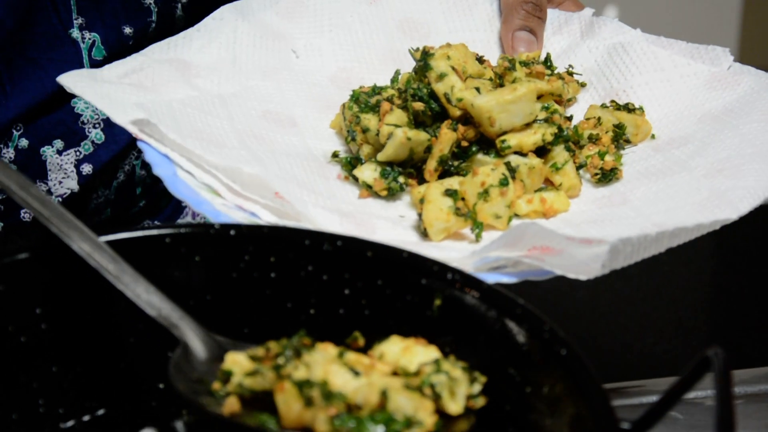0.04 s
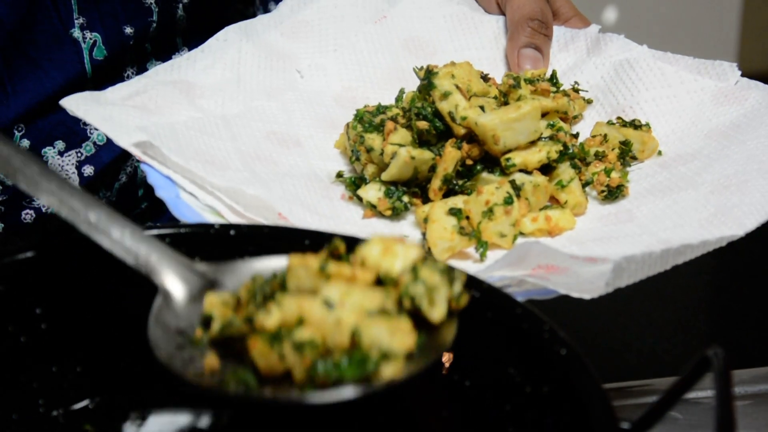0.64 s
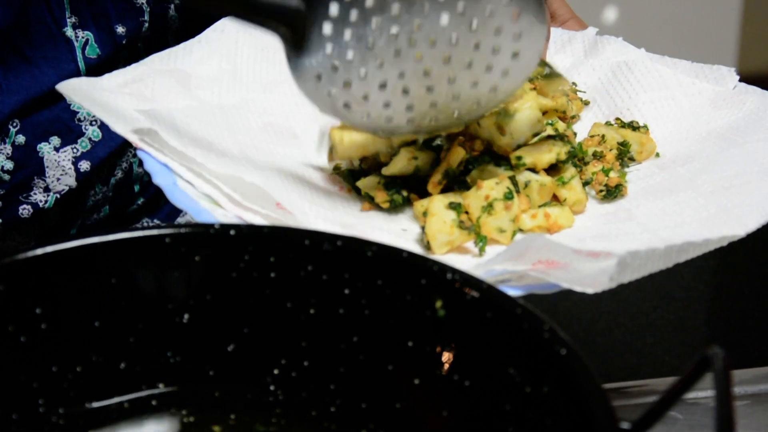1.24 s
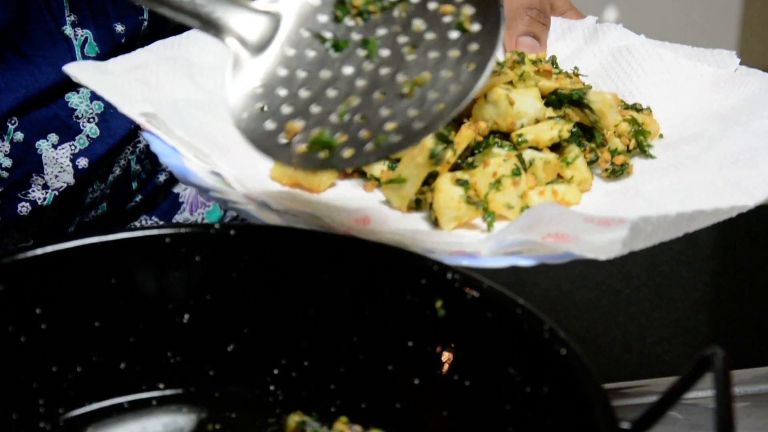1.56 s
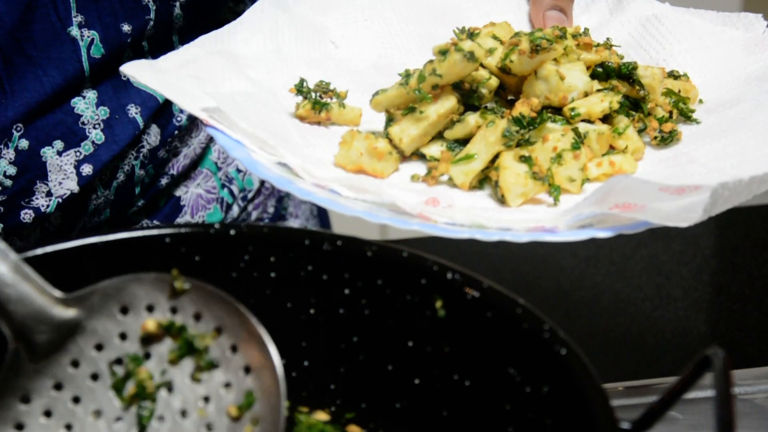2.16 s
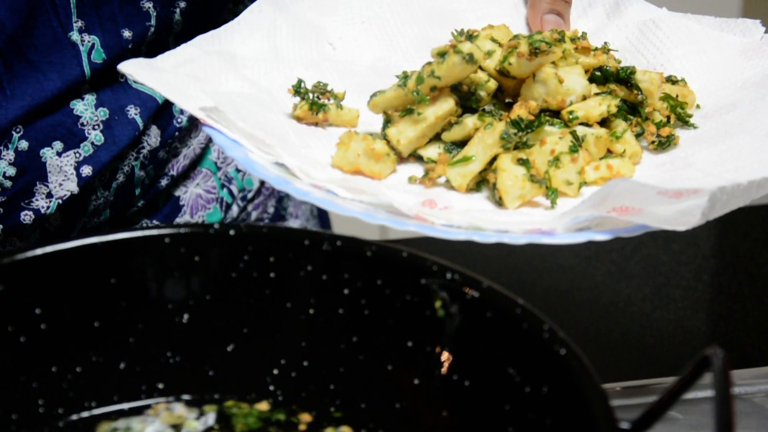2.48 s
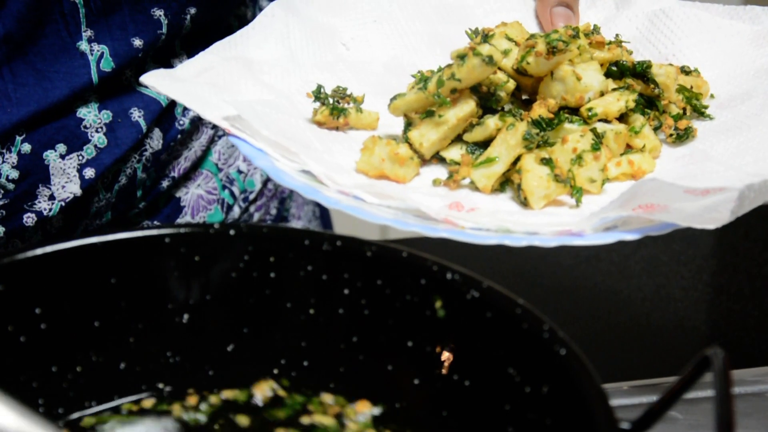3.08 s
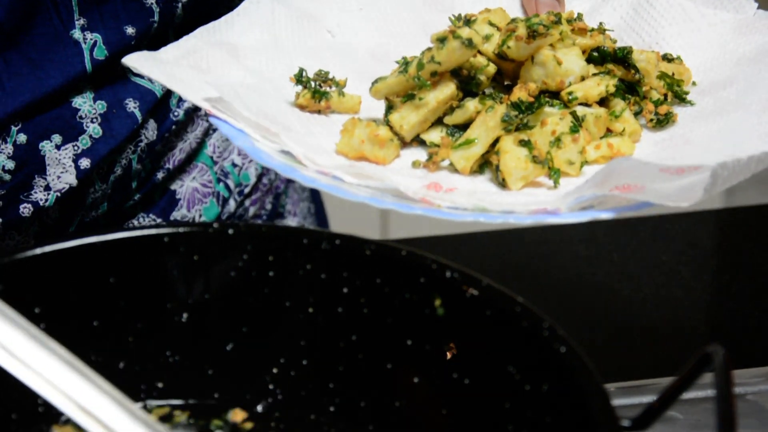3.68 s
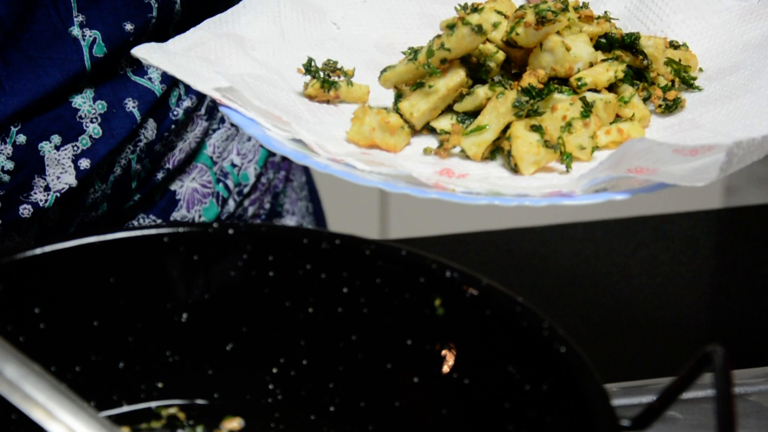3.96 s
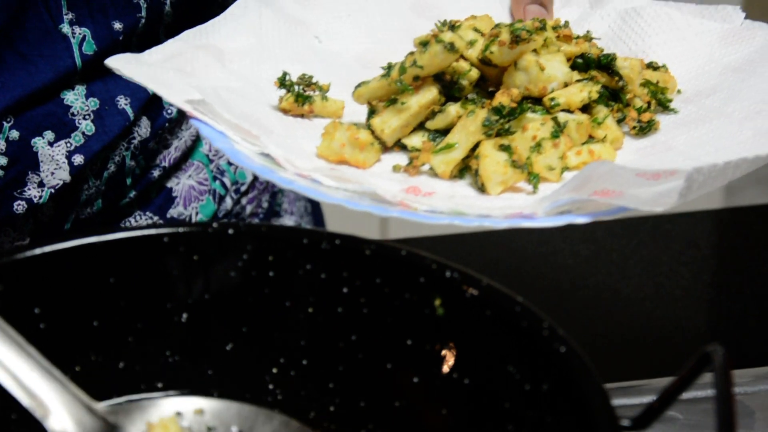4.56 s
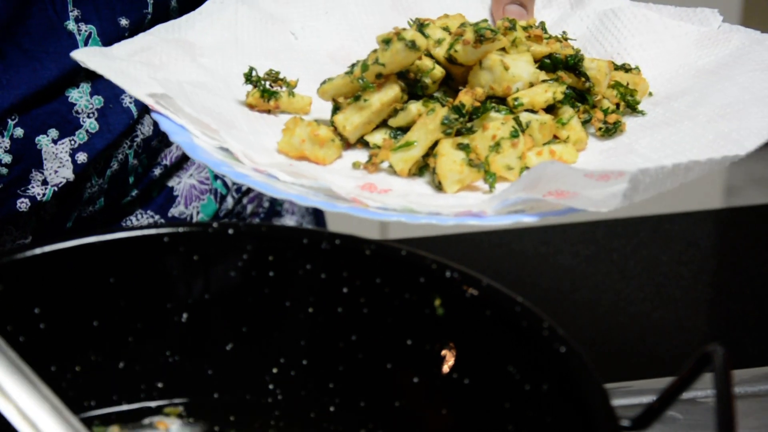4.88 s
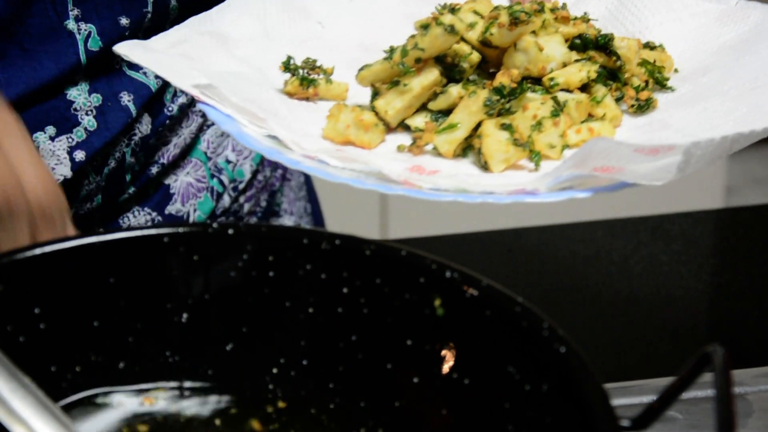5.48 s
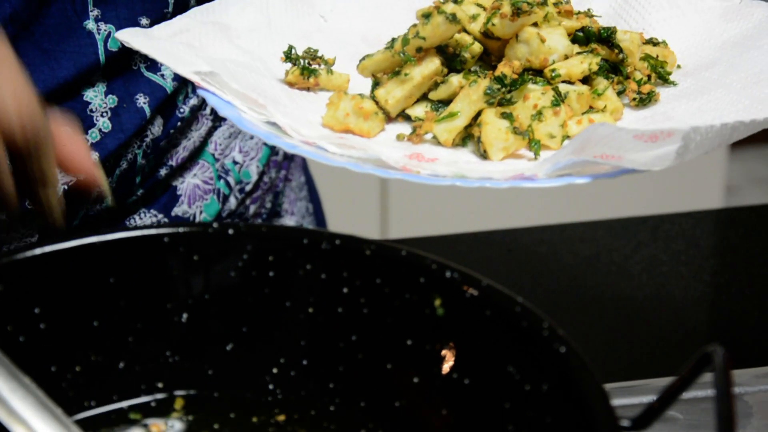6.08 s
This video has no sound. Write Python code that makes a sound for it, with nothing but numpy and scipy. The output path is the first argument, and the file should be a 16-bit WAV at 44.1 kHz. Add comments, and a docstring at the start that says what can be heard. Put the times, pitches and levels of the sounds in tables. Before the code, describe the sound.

Hot oil sizzles softly throughout over a low kitchen rumble, its fizz easing a little after the first second. A slotted steel ladle clinks lightly in a wok at about 0.2 seconds and rubs up the wall around 0.6. Fried food lands on paper with two faint rustles at 1.2 and 1.4 seconds. From 2.1 to 2.7 seconds the ladle knocks and scrapes against the wok with hollow, ringing tones, and again from 2.9 to 3.6. After a second of only sizzle, a clear clink rings at 4.7, followed by more knocks and short scrapes from 5.0 to 5.9. Just before 6 seconds the handle drops onto the rim in a quick, bright, ringing clatter, by far the loudest sound. A light knock follows at 6.3. Everything sounds close, with the short reverberation of a hard-walled kitchen.

```python
"""A slotted steel ladle knocks, scrapes and clinks in a wok as it lifts out fried food; finally it is
let go and its handle clatters loudly on the bare rim. Impacts excite the damped normal modes of the
steel, and stick-slip friction drives them while the ladle slides. Pieces of food rustle onto paper,
and bursting bubbles keep the oil sizzling. A hard-walled kitchen adds reverberation and a low rumble."""
import sys
import numpy as np
from scipy import signal
from scipy.fft import rfft, irfft, next_fast_len
from scipy.io import wavfile
from scipy.ndimage import map_coordinates

SR = 44100
rng = np.random.default_rng(int(sys.argv[2]) if len(sys.argv) > 2 else 0)


def file_out(sig):
    """Save sig as 16-bit WAV at sys.argv[1]."""
    # one column per channel
    cols = np.atleast_2d(sig).T
    # limit, then scale
    lim = np.clip(cols, -1, 1)
    pcm = np.round(lim * 32767).astype(np.int16)
    wavfile.write(sys.argv[1], SR, pcm)


N = 279549
TIME, AGE = np.arange(N) / SR, np.arange(SR) / SR  # scene time, time since a contact [s]
TOP_HZ = 15900  # upper band limit


# handle on rim: (time [s], ring level [dB], contact cut-off [Hz], tick re ring [dB], shank level [dB])
HANDLE_IMPACTS = [(5.936, -24, 4160, -17, -25), (5.942, -31.5, 4730, 4, -29), (5.952, -44, 4000, 6, -30),
                  (5.958, -26, 14100, 6.5, -46), (5.961, -25.5, 12100, 8, -67), (5.971, -28, 13100, 6, -46),
                  (5.999, -30, 2480, -5, -31)]
# spectral envelope of handle against rim: (frequency [Hz], level [dB])
RIM_SPECTRUM = [(20, -77), (70, -39), (200, -16.5), (400, -8.5), (650, -2), (1500, -4), (2600, -1),
                (3500, -4.5), (5500, -2.5), (7000, -7), (10300, -8), (12500, -4), (16000, -21)]
# its resonances: (frequency [Hz], width [Hz], boost [dB])
RIM_RESONANCES = [(723, 210, 6.8), (2900, 310, 5.3), (3870, 160, 6.6), (5130, 180, 7), (5800, 310, 8.5),
                  (6460, 190, 9.5), (7180, 220, 7.4), (7690, 200, 11.3), (8400, 310, 10), (9050, 250, 12),
                  (9850, 450, 11), (10400, 220, 13)]
# free modes of the bare rim: (frequency [Hz], level [dB], T60 [s])
RIM_PARTIALS = [(634, -3, .7), (2918, -1, .65), (3058, 3, .5), (3866, -1, .4), (4790, -2, .42),
                (5158, -2, .36), (5724, 1, .35), (6443, -1, .42), (8966, 1, .32), (9838, -1, .3),
                (10170, 0, .33)]
# free modes of the handle's shank: (frequency [Hz], level [dB], T60 [s])
SHANK_PARTIALS = [(2434, -9, .3), (2605, -9, .15), (2712, -8, .25), (2760, -9, .1), (2870, -5, .06),
                  (2918, -4, .14), (2955, -4, .08), (3058, 0, .13), (3200, -7, .04)]

def handle_clatter(rim_db=-15.0):
    """Impact excitation: the briefer a bounce of the handle, the wider its spectrum on the rim."""
    crash, clang = np.zeros(N), np.zeros(N)
    rim = body(RIM_SPECTRUM, RIM_RESONANCES, tilt_db=2.5)
    for s, db, cut_hz, tick_db, shank_db in HANDLE_IMPACTS:
        gain = lambda hz: rim(hz) - 10 * np.log10(1 + (hz / cut_hz) ** 4)
        add(crash, s, amp(db) * impact(gain, gain, tick_db, tick_t60=0.032))
        add(clang, s, amp(shank_db) * partials(SHANK_PARTIALS))
        hardness = cut_hz / TOP_HZ
        add(clang, s, hardness * amp(db + rim_db) * partials(RIM_PARTIALS))
    return crash + in_kitchen(clang, wet_db=-5.5)


# ladle on bowl: (time [s], ring level [dB], ring tilt [dB/octave], tick re ring [dB],
# hollow tone level [dB], most strongly driven frequency [Hz])
BOWL_IMPACTS = [(.226, -48.5, 4.5, 12, -52, 380), (2.124, -39.5, -1.5, -1, -42.5, 308),
                (2.135, -47.5, -3, -13, -40, 860), (2.401, -36.5, 5.5, 4.5, -48, 520),
                (2.437, -34.5, 1.5, 7.5, -39, 506), (2.451, -34.5, -2, -17, -34, 700),
                (2.506, -44.5, 12.5, 7, -49, 1130), (3.168, -35, -1, 1.5, -45.5, 282),
                (3.18, -39, -2.5, 4.5, -37, 1190), (3.260, -46, -8, -16, -42, 675),
                (4.67, -44.5, -0.5, 12.5, -48, 450), (5.054, -34, -1, -2.5, -41.5, 270),
                (5.065, -35.5, 1.5, 1.5, -36, 480), (5.203, -38.5, -1.5, -8, -45, 1070),
                (5.640, -35, 4.5, -17, -48, 610), (6.325, -45.5, 4, -7, -53, 480)]
# spectral envelope of the oil-damped bowl: (frequency [Hz], level [dB])
BOWL_SPECTRUM = [(20, -75), (60, -43), (200, -20.5), (260, -7.5), (400, -8.5), (600, -3), (1100, -8),
                 (1500, -7), (2500, -8), (3600, -15), (6300, -24), (7500, -35), (11000, -46), (16000, -59)]
# its resonances: (frequency [Hz], width [Hz], boost [dB])
BOWL_RESONANCES = [(255, 20, 9), (360, 30, 6), (470, 40, 11), (521, 18, 6), (620, 40, 8), (700, 26, 8),
                   (750, 30, 9), (875, 50, 7), (1044, 30, 8), (1136, 70, 8), (1470, 35, 8), (1870, 40, 6),
                   (2730, 60, 5)]
# its hollow free modes: (frequency [Hz], level [dB], T60 [s])
BOWL_PARTIALS = [(254, -1, .9), (272, -3, .4), (362, -5, .6), (453, -3, .35), (479, -4, .45), (521, -6, .4),
                 (608, -3, .35), (701, 1, .45), (752, -3, .55), (868, -3, .45), (1044, -6, .5),
                 (1128, -4, .3), (1174, -6, .3), (1384, -5, .2)]
# shimmer of thin steel after a hard tick: (frequency [Hz], level [dB])
SHIMMER_SPECTRUM = [(1500, -20), (4000, 3), (6000, 8.5), (7500, -1), (10000, -1.5), (12000, -11),
                    (16000, -30)]

def ladle_knocks(bloom_s=0.0034, shimmer_re_tick_db=-16, oil_damping_db_per_s=60):
    """Modal excitation: the point struck decides which of the bowl's modes respond most."""
    out = np.zeros(N)
    tick_gain = body(BOWL_SPECTRUM, BOWL_RESONANCES, tilt_db=11.5)
    for s, db, tilt_db, tick_db, tone_db, drive_hz in BOWL_IMPACTS:
        ring = impact(body(BOWL_SPECTRUM, BOWL_RESONANCES, tilt_db), tick_gain, tick_db, tick_t60=0.02)
        tones = partials(BOWL_PARTIALS, drive_hz, db_per_octave=18.5) * (1 - np.exp(-AGE / bloom_s))
        shimmer = shaped(diffuse_tail() * amp(-oil_damping_db_per_s * AGE), SHIMMER_SPECTRUM)
        shimmer *= amp(db + tick_db + shimmer_re_tick_db) / np.std(shimmer[:SR // 30])
        add(out, s, amp(db) * ring + amp(tone_db) * tones + shimmer)
    return out


# ladle dragged over the bowl: (time [s], duration [s], scrape level [dB], low ringing level [dB])
BOWL_DRAGS = [(0.064, 0.077, -59, -60), (0.625, 0.1, -56.5, -56), (2.174, 0.19, -44.5, -49),
              (2.506, 0.21, -38, -52), (2.938, 0.15, -45, -69), (3.38, 0.05, -48.5, -64),
              (3.489, 0.11, -40, -45.5), (5.019, .02, -41, -55), (5.102, 0.062, -39.5, -54),
              (5.197, 0.038, -41, -43.5), (5.718, 0.081, -43, -58), (5.846, 0.06, -45.5, -61)]
# an oiled slip drives mostly the low modes: (frequency [Hz], level [dB])
SLIP_SPECTRUM = [(20, -44), (60, -26), (200, -18), (270, -5), (400, -11.5), (750, -0.5), (1100, -6.5),
                 (1500, -11), (2500, -13.5), (4000, -18), (6300, -18), (8000, -32), (16000, -41)]
# the full scoop rubs up the wall: (time [s], duration [s], level [dB])
SCOOP_RUBS = [(.52, 0.2, -44)]
# spectral envelope of the rubbed scoop: (frequency [Hz], level [dB])
SCOOP_SPECTRUM = [(20, -64), (150, -35), (280, 2.5), (600, -1), (1400, 0), (3500, -2.5), (6500, -7),
                  (12000, -20)]
# its resonances: (frequency [Hz], width [Hz], boost [dB])
SCOOP_RESONANCES = [(288, 35, 10), (385, 30, 5), (458, 26, 15), (690, 60, 8), (1460, 60, 13), (1710, 45, 8),
                    (2150, 60, 6), (2713, 45, 10), (3330, 80, 16)]

def ladle_scrapes():
    """Stick-slip friction: trains of tiny slips force the bowl and the scoop into vibration."""
    motion = dict(rise_s=0.0097, sag_db_per_s=22.4, release_db_per_s=73)
    slips = unit(grains(rate=900, spread_db=3.5) * amp(2.9 * wobble(35)))
    drag = unit(filtered(slips, body(SLIP_SPECTRUM, BOWL_RESONANCES)))
    drag *= strokes([(s, length, db) for s, length, db, _ in BOWL_DRAGS], **motion)
    bowl_tones = partials(BOWL_PARTIALS, drive_hz=340, db_per_octave=10.5)
    drone = unit(signal.fftconvolve(slips, bowl_tones)[:N])
    drone *= strokes([(s, length, db) for s, length, _, db in BOWL_DRAGS], **motion)
    rub = unit(filtered(grains(rate=450, spread_db=2.5), body(SCOOP_SPECTRUM, SCOOP_RESONANCES)))
    rub *= strokes(SCOOP_RUBS, rise_s=0.021, sag_db_per_s=7, release_db_per_s=150)
    return in_kitchen(rub, wet_db=-7) + drone + in_kitchen(drag, wet_db=5)


# light touches on the scoop: (time [s], level [dB], most strongly driven frequency [Hz],
# fall away from it [dB/octave], load [1 full, 0 empty])
SCOOP_TOUCHES = [(.226, -38.5, 2100, 1.5, 1), (.317, -46, 2100, 2, 1), (2.244, -43.5, 2100, 20, 1),
                 (4.667, -37, 1720, 1, 0)]
# free modes of the empty scoop: (frequency [Hz], level [dB], T60 [s])
EMPTY_PARTIALS = [(1647, -3, .3), (1700, 2, .05), (1723, 1, .48), (2304, -4.5, .62), (2713, -13, .6),
                  (3262, -6, .3), (3321, -8, .42), (3876, -1, .27), (4826, -5, .33), (5396, -7, .17),
                  (5785, -1, .16)]
# free modes of the full scoop: (frequency [Hz], level [dB], T60 [s])
FULL_PARTIALS = [(272, -12, .6), (385, -9.5, .5), (462, -15, .5), (665, -11, .45), (2040, 1, .04),
                 (2110, 2, .08), (2160, -4.5, .3), (2719, -12, .3), (4520, -5, .06), (4572, -2, .1),
                 (5292, -8, .08)]

def scoop_clinks():
    """Mass loading: a touched scoop rings freely, lower and more damped when it holds food."""
    out = np.zeros(N)
    for s, db, drive_hz, db_per_octave, full in SCOOP_TOUCHES:
        modes = FULL_PARTIALS if full else EMPTY_PARTIALS
        add(out, s, amp(db) * partials(modes, drive_hz, db_per_octave))
    return in_kitchen(out, wet_db=-4)


# pieces land on paper: (time [s], duration [s], level [dB])
FOOD_LANDINGS = [(1.16, 0.11, -52), (1.43, 0.032, -47.5)]
# rustle of the paper: (frequency [Hz], level [dB])
PAPER_SPECTRUM = [(20, -53), (130, -14), (300, -11), (1200, -3), (2200, 3), (3800, -2), (6000, -8),
                  (15000, -32)]

def food_on_paper():
    """Impulsive noise: each soft piece sets off tiny crackles in the paper that merge into a rustle."""
    rustle = unit(shaped(grains(rate=650, spread_db=-1.5), PAPER_SPECTRUM))
    rustle *= strokes(FOOD_LANDINGS, rise_s=0.014, sag_db_per_s=10, release_db_per_s=81)
    return in_kitchen(rustle, wet_db=-1)


# soft sizzle of the oil over the kitchen's low rumble: (frequency [Hz], level [dB])
SIZZLE_AND_RUMBLE = [(15, -60), (25, -30), (66, -18.5), (100, -15), (130, -8.5), (185, -8.5), (223, -9.5),
                     (363, -11), (754, -6), (863, -5.5), (1190, -4), (1700, -5.5), (1940, -3.5),
                     (2350, -7.5), (7310, -20.5), (11000, -20.5), (16000, -40)]
# fine fizz of the oil: (frequency [Hz], level [dB])
FIZZ_SPECTRUM = [(1500, -18.5), (3500, -1.5), (6000, 1.5), (7500, -4), (10200, -4.5), (11800, -10.5),
                 (13300, -12), (16000, -31)]

def oil_and_rumble(calming_db_per_s=0.61, wet_food_db=6, lift_s=0.62, settle_s=0.44):
    """Shot noise: bubbles burst over the room's rumble; the fizz subsides once the wet food is out."""
    bed = in_kitchen(grains(rate=5000, spread_db=2.5), wet_db=-5.5)
    bed = unit(shaped(bed, SIZZLE_AND_RUMBLE)) * amp(-47.5 - calming_db_per_s * TIME)
    fizz = in_kitchen(grains(rate=3300, spread_db=0.5), wet_db=-5.5)
    wetness = np.exp(-np.maximum(TIME - lift_s, 0) / settle_s)
    fizz_db = -57.5 + wet_food_db * wetness + 2.4 * wobble(5.85)
    return bed + unit(shaped(fizz, FIZZ_SPECTRUM)) * amp(fizz_db)


# joint decay of wok and kitchen: (frequency [Hz], T60 [s])
DECAY_TIMES = [(250, 1), (600, 0.68), (1400, 0.9), (3000, 0.76), (5500, 0.54), (10000, 0.42), (15000, 0.42)]

def diffuse_tail():
    """Modal overlap: dense modes merge into a second of noise, each band decaying at its own rate."""
    hz, t, spectrum = signal.stft(rng.standard_normal(SR), SR, nperseg=256)
    decay = amp(-60 * t / along(DECAY_TIMES, hz)[:, None])
    return signal.istft(spectrum * decay, SR, nperseg=256)[1][:SR]


def in_kitchen(x, wet_db):
    """Reverberation: direct sound plus wall reflections, at about unchanged power."""
    echo = diffuse_tail()
    wet = signal.fftconvolve(x, echo / np.linalg.norm(echo))[:len(x)]
    return (x + amp(wet_db) * wet) / np.hypot(1, amp(wet_db))


def impact(ring_gain, tick_gain, tick_db, tick_t60):
    """Transient response: a short contact tick, then the dense ring of steel and room."""
    ring = filtered(diffuse_tail(), ring_gain)
    ring /= np.std(ring[:SR // 30])
    burst = rng.standard_normal(SR // 10) * amp(-60 * AGE[:SR // 10] / tick_t60)
    tick = filtered(burst, tick_gain)
    add(ring, 0, amp(tick_db) * tick / np.std(tick[:SR // 300]))
    return ring


def partials(modes, drive_hz=1000, db_per_octave=0):
    """Superposition of damped modes, weaker away from drive_hz, starting near rms 1."""
    ring = np.zeros(SR)
    for hz, db, t60 in modes:
        sign = rng.choice([-1, 1])
        start_db = db - db_per_octave * abs(np.log2(hz / drive_hz)) + rng.normal()
        ring += sign * amp(start_db - 60 * AGE / t60) * np.cos(2 * np.pi * hz * AGE)
    return ring / np.std(ring[:SR // 50])


def body(outline, resonances, tilt_db=0):
    """Frequency response [dB]: envelope, resonance peaks and a tilt per octave for contact hardness."""
    def gain_db(hz):
        peaks = sum(db / (1 + (2 * (hz - centre) / width) ** 2) for centre, width, db in resonances)
        return along(outline, hz) + peaks + tilt_db * np.log2(1 + hz / 700)
    return gain_db


def strokes(rows, rise_s, sag_db_per_s, release_db_per_s):
    """Incoherent addition: movements rise, sag and release, and their envelopes sum in power."""
    power = np.zeros(N)
    for s, length, db in rows:
        t = np.maximum(TIME - s, 0)
        fall_db = sag_db_per_s * np.minimum(t, length) + release_db_per_s * np.maximum(t - length, 0)
        power += (np.minimum(t / rise_s, 1) * amp(db - fall_db)) ** 2
    return np.sqrt(power)


def grains(rate, spread_db):
    """Poisson process: on average rate impulses a second, of uneven size, rms 1."""
    sizes = amp(spread_db * np.minimum(rng.standard_exponential(N), 5))
    return unit((rng.random(N) < rate / SR) * sizes * rng.choice([-1, 1], N))


def wobble(rate):
    """Random modulation: a smooth curve with rate knots a second."""
    return map_coordinates(rng.standard_normal(int(N * rate / SR) + 4), [TIME * rate])


def filtered(x, gain_db):
    """Minimum-phase filtering: folding the cepstrum makes the response gain_db(hz) causal."""
    m = 2 * next_fast_len(x.shape[-1] // 2 + 4096)
    cepstrum = irfft(np.log(amp(gain_db(np.fft.rfftfreq(m, 1 / SR)))), m)
    cepstrum[1:m // 2] *= 2
    cepstrum[m // 2 + 1:] = 0
    return irfft(rfft(x, m) * np.exp(rfft(cepstrum)), m)[..., :x.shape[-1]]


def shaped(x, spectrum):
    """Spectral shaping by (frequency [Hz], level [dB]) points."""
    return filtered(x, lambda hz: along(spectrum, hz))


def along(points, hz):
    """Interpolation on a logarithmic frequency axis."""
    freqs, values = np.transpose(points)
    return np.interp(np.log(hz + 1), np.log(freqs + 1), values)


def amp(db):
    """Decibels to amplitude ratio."""
    return 10 ** (np.asarray(db) / 20)


def unit(x):
    """Normalisation to rms 1."""
    return x / np.sqrt(np.mean(x ** 2) + 1e-20)


def add(track, s, sound):
    """Superposition of a sound at time s."""
    part = track[round(s * SR):][:len(sound)]
    part += sound[:len(part)]


def stereo(mid, side, width):
    """Mid-side stereo: the shaped side signal is added on the left and subtracted on the right."""
    side = shaped(side, width)
    return np.array([mid + side, mid - side])


# stereo width of the steel: (frequency [Hz], side re mid [dB])
STEEL_WIDTH = [(300, -48), (2500, -30), (4500, -17), (6500, -14), (9000, 0.5), (10500, -9), (12500, -8),
               (15000, -9)]
# stereo width of oil and rumble: (frequency [Hz], side re mid [dB])
BACKGROUND_WIDTH = [(100, -21.5), (400, -5.5), (1400, -12.5), (3100, -12.5), (7000, -9.5), (15000, -4.5)]

def scene():
    """Partial coherence: mainly the short waves differ between two close listening points."""
    ladle = lambda: ladle_knocks() + handle_clatter() + scoop_clinks() + ladle_scrapes()
    foreground = stereo(ladle() + food_on_paper(), ladle(), STEEL_WIDTH)
    background = stereo(oil_and_rumble(), oil_and_rumble(), BACKGROUND_WIDTH)
    balance_db = [[.25], [-.25]]
    return (foreground + background) * amp(balance_db)


def record(dry):
    """Soft saturation rounds the highest peaks; a low-pass removes everything above TOP_HZ."""
    rounded = dry / (1 + (dry / .8) ** 6) ** (1 / 6)
    m = next_fast_len(N + SR // 2)
    passband = np.fft.rfftfreq(m, 1 / SR) < TOP_HZ
    return irfft(rfft(rounded, m) * passband, m)[:, :N]


dry = scene()
out = record(dry)
file_out(out)
```